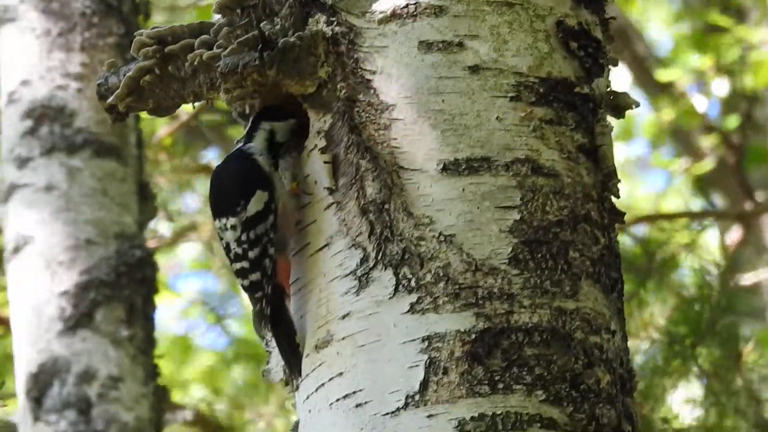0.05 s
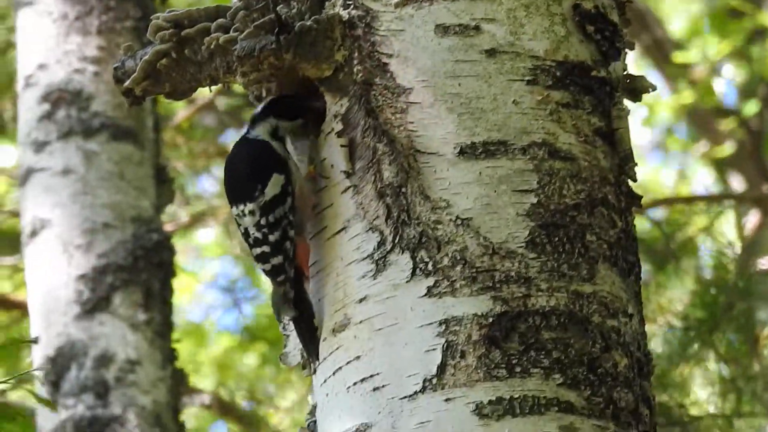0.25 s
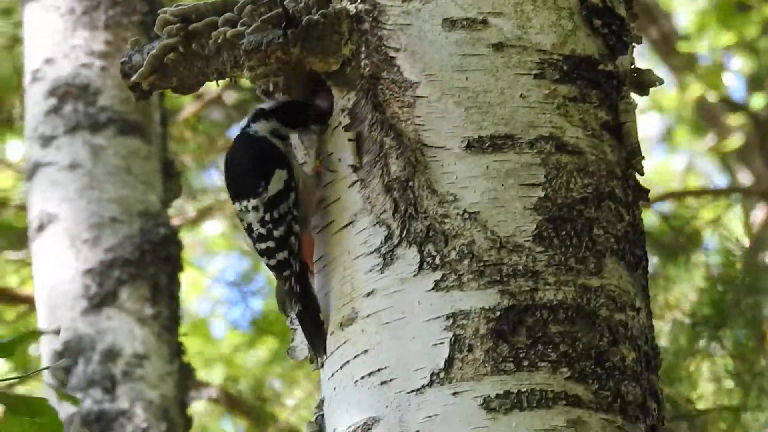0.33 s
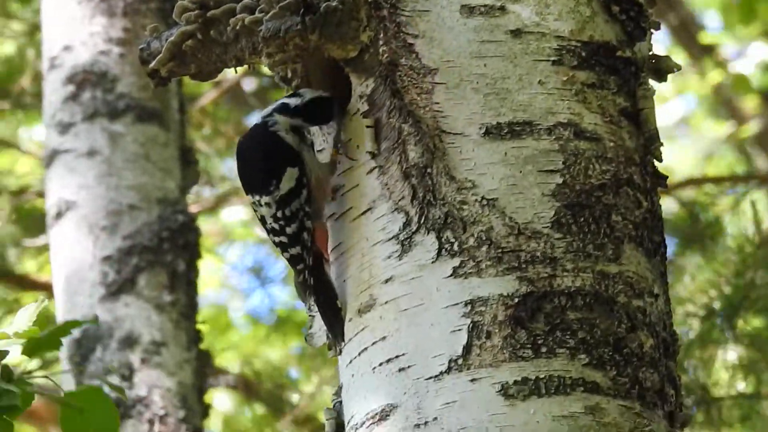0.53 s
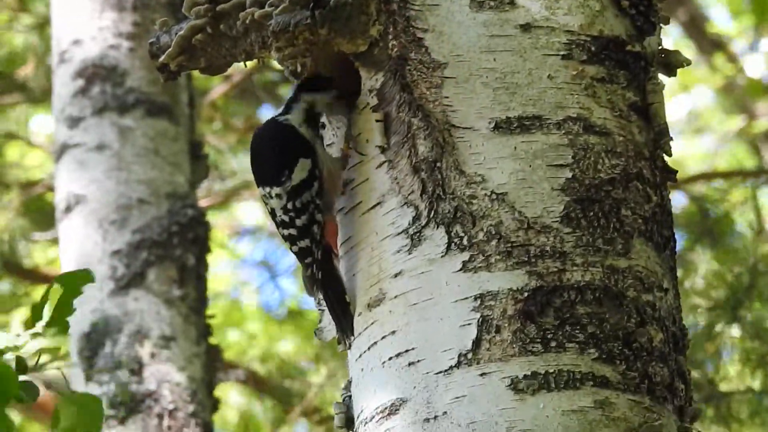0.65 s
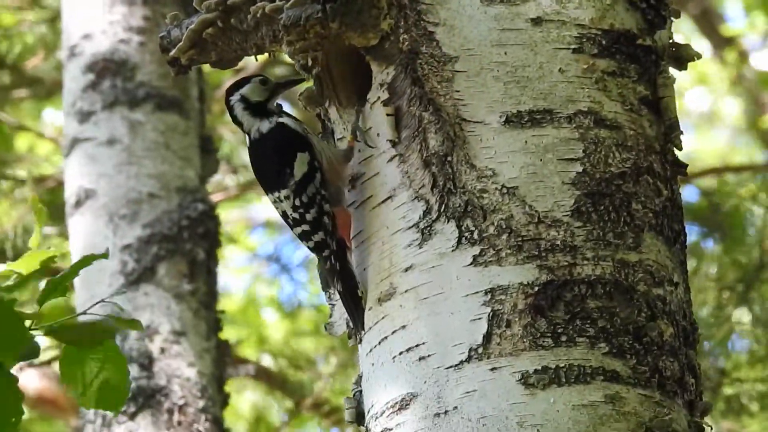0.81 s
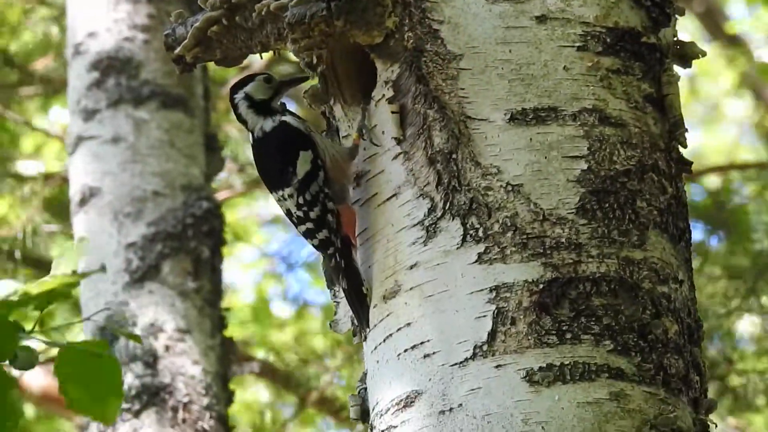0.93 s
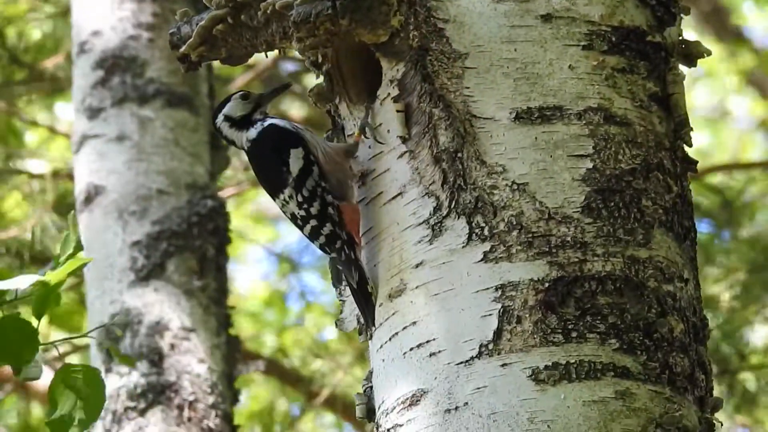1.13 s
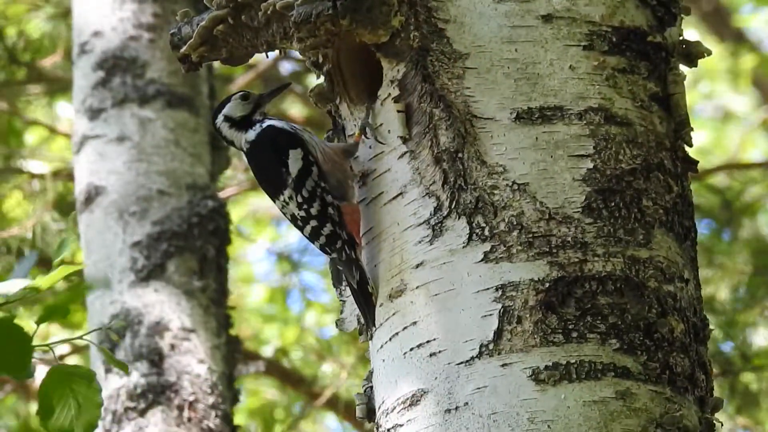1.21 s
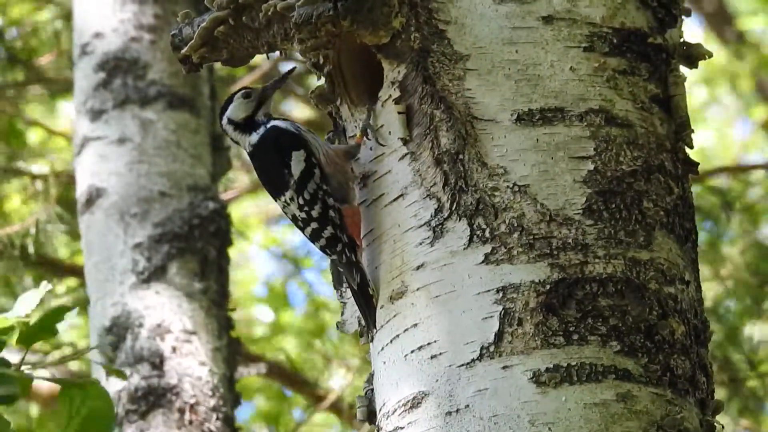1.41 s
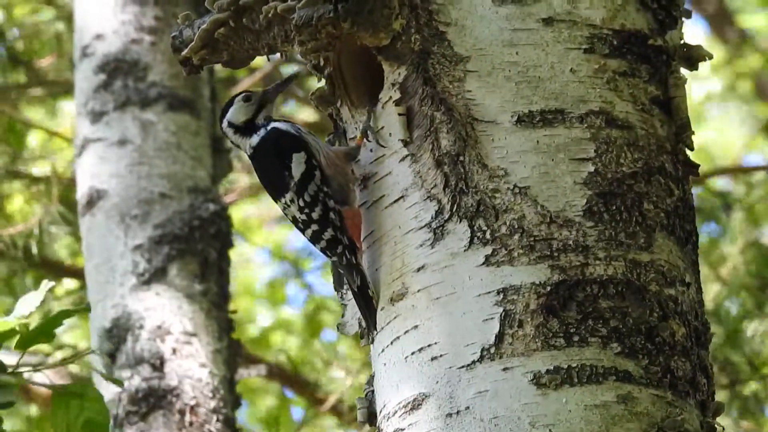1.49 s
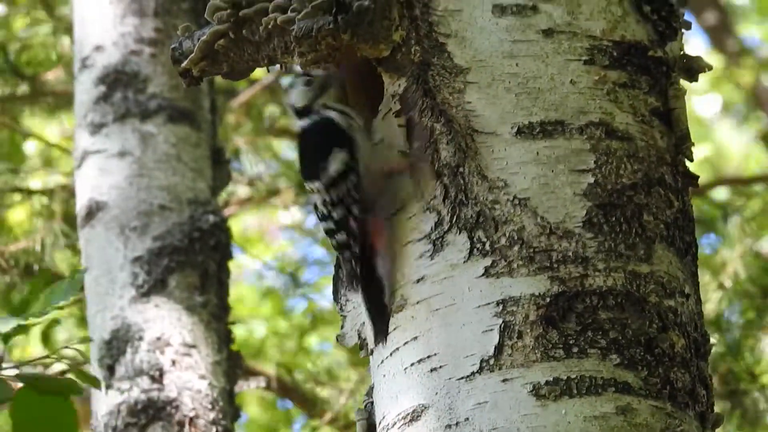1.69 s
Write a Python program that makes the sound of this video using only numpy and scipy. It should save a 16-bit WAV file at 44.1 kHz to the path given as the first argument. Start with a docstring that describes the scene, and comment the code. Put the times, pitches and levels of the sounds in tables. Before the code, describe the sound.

A woodpecker gives short squeaky calls, one far louder, while a songbird whistles in the forest

```python
"""A woodpecker at its nest hole gives seven squeaky calls, one much louder than the rest.
Each is a stack of harmonics: a held lead-in jumps to a crest, then falls away.
A songbird whistles rising, then falling slurs, and ends on faint low notes; bark is scratched twice.
Both birds are scattered by the forest, and the woodpecker also has one late echo.
Shaped noise makes a far rumble with a low drone, and a high haze of distant birds and leaves."""
import sys
import numpy as np
from scipy import signal
from scipy.fft import rfft, irfft, next_fast_len
from scipy.io import wavfile
from scipy.ndimage import uniform_filter1d, map_coordinates

SR = 44100
rng = np.random.default_rng(int(sys.argv[2]) if len(sys.argv) > 2 else 0)


def put_to_file(sound):
    """Save the sound as 16-bit audio at rate SR, in the file named by the first command-line argument."""
    columns = np.atleast_2d(sound).T  # one column per channel
    safe = np.clip(columns, -1, 1)
    whole_steps = np.round(safe * 32767)
    wavfile.write(sys.argv[1], SR, whole_steps.astype(np.int16))


N = 77175  # samples, 1.75 s


def amp(db):
    """Turn decibels into a plain multiplier."""
    return 10 ** (np.asarray(db) / 20)


def unit(x):
    """Scale a sound to an average strength (rms) of 1."""
    return x / np.sqrt(np.mean(x ** 2) + 1e-20)


def along(points, hz):
    """Read a curve of (pitch_hz, value) points, joined on a logarithmic pitch axis."""
    point_hz, value = np.transpose(points)
    return np.interp(np.log(hz + 1), np.log(point_hz + 1), value)


def clock():
    """Time in seconds at every sample."""
    return np.arange(N) / SR


def wobble(rate):
    """A smooth random curve around zero, with rate random knots a second."""
    knots = rng.standard_normal(int(N * rate / SR) + 4)
    return map_coordinates(knots, [clock() * rate])


def filtered(x, response):
    """Change the strength and timing of each frequency in x by a response curve."""
    size = next_fast_len(N + SR // 2)
    hz = np.fft.rfftfreq(size, 1 / SR)
    return irfft(rfft(x, size) * response(hz), size)[..., :N]


# How alike left and right noise are, by pitch; columns: pitch_hz, likeness (1 = identical)
NOISE_LIKENESS = [(40, 0.71), (150, 0.94), (600, 0.97), (1500, 0.88), (3000, 0.95), (5000, 0.43),
                  (12000, 0.15)]


def rush(gain):
    """Coloured stereo noise of rms 1: its ears share most up to 3 kHz and less in the high treble."""
    def mid_side_gain(hz):
        turn = np.arccos(np.clip(along(NOISE_LIKENESS, hz), -1, 1)) / 2
        return gain(hz) * np.array([np.cos(turn), np.sin(turn)])

    mid, side = filtered(rng.standard_normal((2, N)), mid_side_gain)
    return unit(np.array([mid + side, mid - side]))


def patchy(x, depth_db):
    """Slow random swells, different from band to band."""
    bands = signal.stft(x, nperseg=1024)[2]
    field = rng.standard_normal(bands.shape[1:])
    field = uniform_filter1d(field, size=4, axis=0)  # blend neighbouring pitches
    field = uniform_filter1d(field, size=8, axis=1)  # blend neighbouring moments
    swelling = bands * amp(depth_db * unit(field))
    return unit(signal.istft(swelling, nperseg=1024)[1][:, :N])


# Colour of the far rumble; columns: pitch_hz, relative level_db
RUMBLE_COLOUR = [(15, -49), (25, -19), (59, -7), (134, -8.5), (193, 1), (272, -6), (362, -3.5), (643, -4),
                 (778, -8), (1460, -10), (1700, -14.5), (1870, -10.5), (2140, -13), (2400, -10.5),
                 (3120, -16), (5280, -120)]
RUMBLE_DB, RUMBLE_SWELL_DB = -44.5, 1.5
# Colour of the distant birds and leaves; columns: pitch_hz, relative level_db
HAZE_COLOUR = [(1500, -37.5), (2300, -9.5), (3100, -0.5), (3900, -0.5), (5000, 5), (6000, 1.5),
               (7200, -7.5), (8500, -21), (11000, -26), (15500, -36)]
HAZE_DB = -40
DRONE_HZ, DRONE_HALF_WIDTH_HZ, DRONE_DB = 191, 14, -66


def background():
    """Far rumble, a low drone of narrow noise, and a high haze of distant birds and leaves."""
    rumble = rush(lambda hz: amp(along(RUMBLE_COLOUR, hz)))
    rumble = amp(RUMBLE_DB) * patchy(rumble, RUMBLE_SWELL_DB)
    drone = rush(lambda hz: 1 / (1 + ((hz - DRONE_HZ) / DRONE_HALF_WIDTH_HZ) ** 2))
    drone = amp(DRONE_DB) * drone
    haze = rush(lambda hz: amp(along(HAZE_COLOUR, hz)))
    haze = amp(HAZE_DB + 0.3 * wobble(7.3)) * haze
    return rumble + drone + haze


# How long the forest tail rings; columns: pitch_hz, time_s to fade by 60 dB
FOREST_FADE = [(1500, 1), (4500, 0.61), (7000, 0.39), (9000, 0.23), (14000, 0.081)]
# Colour of the forest's answer; columns: pitch_hz, gain_db
FOREST_COLOUR = [(1500, 6), (4500, 4), (6900, 8), (8200, 7.5), (14000, -13)]
FOREST_LIKENESS = 0.57  # left-right likeness, 1 = identical
NEAR_DB, NEAR_FADE_S = -4, 0.089  # near scatter: level, time to fade by 60 dB


def forest(x):
    """Quick scatter from near trunks and a longer tail from the wood, both made of fading noise."""
    _, t, bands = signal.stft(rng.standard_normal((2, SR)), SR, nperseg=256)
    hz = np.arange(129) * SR / 256
    fading = bands * amp(-60 * t / along(FOREST_FADE, hz)[:, None])
    tail = signal.istft(fading, SR, nperseg=256)[1][:, :SR]
    near = rng.standard_normal((2, SR)) * amp(-60 * np.arange(SR) / SR / NEAR_FADE_S)
    scatter = (1.005 * unit(tail) + amp(NEAR_DB) * unit(near)) / np.sqrt(SR)
    turn = np.arccos(np.clip(FOREST_LIKENESS, -1, 1)) / 2
    mid, side = scatter * [[np.cos(turn)], [np.sin(turn)]]
    answer = np.array([mid + side, mid - side])
    wet = signal.fftconvolve(x[None], answer, axes=1)[:, :N]
    return filtered(wet, lambda hz: amp(along(FOREST_COLOUR, hz)))


def placed(x, direction, forest_db):
    """A source heard from one side by level and arrival time, with the forest's answer added."""
    pan_db, lead_ms = direction
    half = np.array([[.5], [-.5]])  # share the difference between left and right
    lead_s = lead_ms / 1000
    direct = filtered(x, lambda hz: amp(half * pan_db) * np.exp(2j * np.pi * hz * half * lead_s))
    return direct + amp(forest_db) * forest(x)


# The woodpecker's calls, one a row; columns:
# crest_s, lead_in_s, rise_s, fall_s (times), start_hz, lead_in_hz, crest_hz (pitches),
# start_db, lead_in_db, crest_db (levels), throat_hz (resonance), second_harmonic_db,
# upper_harmonics_db (extra on the fifth and up), rasp (0 to 1), forest_db (forest's answer)
CALLS = [ (0.017, 0.0075, .010, .026, 1308, 1350, 1430, -65, -46, -41, 5600, 11.5, 2, 0.38, -7.5),
         (0.249, .056, 0.034, 0.023, 1440, 1336, 1676, -48.5, -36, -30, 6030, 5.5, 3, 0, -10.5),
         (.478, .056, .010, .039, 1340, 1571, 1924, -37.5, -15, -18, 5230, -1.5, -7.5, 0.07, -16),
         (.735, .060, 0.019, 0.019, 1540, 1463, 1706, -41, -34, -30.5, 6030, 6, 1.5, 0.81, -6.5),
         (1.029, .012, .038, 0.026, 1411, 1479, 1850, -64, -39.5, -31, 6290, 5, -1, 0.31, -6.5),
         (1.301, .040, .020, .020, 1400, 1349, 1504, -55, -36.5, -36, 5900, 9.5, -0.5, 0.75, -8),
         (1.571, .045, 0.0096, 0.012, 1462, 1327, 1513, -54, -42, -34, 5800, 10.5, -3, 0.51, -10.5)]
# Balance of the voice, from the fundamental up; column: relative level_db
HARMONIC_LEVELS = [-11.5, -9, 0.5, -0.5, -8.5, -10, -10.5]
# Colour the beak gives the voice; columns: pitch_hz, gain_db
BEAK_COLOUR = [(1400, -15), (1900, 2), (3000, 3.5), (7000, 0.5), (8200, -1), (9600, 5), (11000, -14),
               (12500, -7), (14500, -21)]
# Colour of the rasp in the throat; columns: pitch_hz, relative level_db
RASP_COLOUR = [(2000, -35), (3200, 6), (4000, -1), (5800, 10.5), (7500, -1.5), (9500, -15.5), (12000, -6.5),
               (15000, -34)]
# The woodpecker's direction; columns: left_over_right_db, left_lead_ms
WOODPECKER_SIDE = (0.2, 0.0097)
RASP_DB = -42  # at full rasp
THROAT_DB, THROAT_HALF_WIDTH_HZ = 11, 895
END_HZ, FALL_POWER, FALL_RATE = 1180, 3.6, 2.9  # pitch the fall heads for, its lateness and speed
FADE_DB, SECOND_GROWS_DB = 10.5, 9.5  # over the fall: level lost, gain of the second harmonic
JITTER, RASP_JITTER, SHIMMER_DB = .003, .05, .8  # pitch shake (fraction), added by rasp; level shake
ECHO_S, ECHO_DB = 0.069, -26


def woodpecker():
    """Harmonics through a throat resonance: swelling, often raspy lead-in, jump, late-bending fall."""
    t, out = clock(), np.zeros((2, N))
    k = np.arange(1, len(HARMONIC_LEVELS) + 1)[:, None]  # harmonic number
    harmonic_db = np.array(HARMONIC_LEVELS)[:, None]
    hiss = filtered(rng.standard_normal(N), lambda hz: amp(along(RASP_COLOUR, hz)))
    hiss = amp(RASP_DB) * unit(hiss)
    for (crest_s, lead_s, rise_s, fall_s, start_hz, lead_hz, crest_hz, start_db, lead_db, crest_db,
         throat_hz, second_db, upper_db, rasp, forest_db) in CALLS:
        # progress of each stage, from 0 towards 1
        jump_s = crest_s - rise_s
        held = np.clip((t - jump_s + lead_s) / lead_s, 0, 1)
        risen = np.sin(np.pi / 2 * np.clip((t - jump_s) / rise_s, 0, 1)) ** 2
        fallen = 1 - np.exp(-FALL_RATE * np.clip((t - crest_s) / fall_s, 0, 2) ** FALL_POWER)

        pitch = lead_hz + (start_hz - lead_hz) * (1 - held) ** 2.78
        pitch += (crest_hz - lead_hz) * risen - (crest_hz - END_HZ) * fallen
        pitch *= 1 + JITTER * wobble(500) + RASP_JITTER * rasp * (1 - risen) * wobble(650)
        level_db = start_db + (lead_db - start_db) * held + (crest_db - lead_db) * risen
        level_db += SHIMMER_DB * wobble(300) - FADE_DB * fallen

        begin_s, end_s = jump_s - lead_s, crest_s + fall_s
        gate = np.interp(t, [begin_s - .004, begin_s, end_s, end_s + .005], [0, 1, 1, 0])
        on = gate > 0
        hz = k * pitch[on]
        throat_db = THROAT_DB / (1 + ((hz - throat_hz) / THROAT_HALF_WIDTH_HZ) ** 4)
        second = (k == 2) * (second_db + SECOND_GROWS_DB * fallen[on])
        source_db = harmonic_db + upper_db * (k > 4) + second
        gains = amp(source_db + throat_db + along(BEAK_COLOUR, hz))
        tones = gains * np.sin(2 * np.pi * np.cumsum(hz, axis=1) / SR)
        voice = np.zeros(N)
        # dividing by the total strength leaves the loudness to level_db
        voice[on] = np.sqrt(2) * tones.sum(0) / np.linalg.norm(gains, axis=0)
        breath = hiss * rasp * (.5 + .5 * held) * (1 - fallen)
        voice = gate * (voice * amp(level_db) + breath)
        echo = amp(ECHO_DB) * np.interp(t - ECHO_S, t, voice, left=0)
        out += placed(voice, WOODPECKER_SIDE, forest_db) + echo
    return out


def whistles(shape, notes, waver=0.0033, flutter_db=1):
    """Repeat one note shape as a pure tone, with slight random shakes of pitch and level."""
    t, out = clock(), np.zeros(N)
    when, hz, db = np.transpose(shape)
    for crest_s, note_db in notes:
        pitch = uniform_filter1d(np.interp(t - crest_s, when, hz), size=150)  # round the corners
        pitch = pitch * (1 + waver * wobble(400))
        shape_db = np.interp(t - crest_s, when, db, left=-120, right=-120)
        level = amp(note_db + shape_db + flutter_db * wobble(200))
        out += np.sqrt(2) * level * np.sin(2 * np.pi * np.cumsum(pitch) / SR)
    return out


# Songbird note shapes; columns: time_s from the crest, pitch_hz, relative level_db
UPSLUR_SHAPE = [(-.072, 3650, -25), (-.064, 3780, -5), (-.045, 3960, -8), (-.025, 4020, -8),
                (-.012, 4250, -7), (-.007, 4600, -1), (-.002, 5850, 1), (.001, 6200, 0), (.005, 5700, -4),
                (.009, 4800, -25)]
FLICK_SHAPE = [(-.005, 6200, -31), (-.001, 5600, 9.5), (.003, 5000, -0.5), (.008, 4500, -16)]
SOFT_SLUR_SHAPE = [(-.014, 3900, -12), (-.004, 4480, 0), (.008, 4380, -1), (.026, 3750, 0),
                   (.043, 3150, -2), (.05, 2600, -1), (.055, 2450, -18)]
DOWNSLUR_SHAPE = [(-.024, 3100, -26), (-.014, 3900, -17), (-.008, 4720, -6), (0, 5040, -3), (.008, 4830, 0),
                  (.016, 4450, -1), (.022, 4150, -14), (.036, 3600, -12), (.05, 3130, -15),
                  (.058, 2900, -32)]
LOW_NOTE_SHAPE = [(-.03, 2750, -14), (-.022, 2860, -2), (-.008, 3040, 0), (.003, 3110, 0),
                  (.016, 3050, -12)]
# When each shape is sung; columns: crest_s, level_db
UPSLUR_TIMES = [(.061, -32.5), (.201, -34), (.347, -33.5)]
FLICK_TIMES = [(0.569, -37), (0.879, -41.5), (1.203, -41.5)]
SOFT_SLUR_TIMES = [(.603, -37)]
DOWNSLUR_TIMES = [(.758, -25.5), (0.909, -26), (1.071, -26), (1.236, -26)]
LOW_NOTE_TIMES = [(1.385, -45.5), (1.461, -45), (1.542, -42), (1.620, -42.5), (1.698, -42.5)]
# The songbird's direction; columns: left_over_right_db, left_lead_ms
SONGBIRD_SIDE = (-0.5, -0.016)
SONG_FOREST_DB, LOW_FOREST_DB = -9, -9


def songbird():
    """Gliding pure tones slightly to the right, then fainter low notes a little further right."""
    song = whistles(UPSLUR_SHAPE, UPSLUR_TIMES)
    song += whistles(SOFT_SLUR_SHAPE, SOFT_SLUR_TIMES)
    song += whistles(DOWNSLUR_SHAPE, DOWNSLUR_TIMES)
    song += whistles(FLICK_SHAPE, FLICK_TIMES)
    low = whistles(LOW_NOTE_SHAPE, LOW_NOTE_TIMES)
    return placed(song, SONGBIRD_SIDE, SONG_FOREST_DB) + placed(low, (-2, 0), LOW_FOREST_DB)


# Scratches on the bark; columns: peak_s, level_db
SCRATCH_TIMES = [(0.833, -44), (0.874, -41.5)]
# Colour of scraped bark; columns: pitch_hz, relative level_db
BARK_COLOUR = [(500, -21), (2100, 13), (3500, -7), (6500, -7), (9000, -21), (15000, -35)]
SCRATCH_S = 0.0042  # from the peak to about a third of its height


def scratches():
    """Short dry scrapes on the bark: coloured noise in brief rounded bursts."""
    level = np.zeros(N)
    for peak_s, level_db in SCRATCH_TIMES:
        level += amp(level_db) * np.exp(-((clock() - peak_s) / SCRATCH_S) ** 2)
    return level * rush(lambda hz: amp(along(BARK_COLOUR, hz)))


# Tone difference between the ears; columns: pitch_hz, left_over_right_db
LEFT_TILT = [(3000, -4.5), (5800, -2.5), (7500, 7), (10000, 0.5), (14000, 1)]


def scene():
    """Birds and scratches, with a left-right tone difference, over the background."""
    near = woodpecker() + songbird() + scratches()
    half = np.array([[.5], [-.5]])
    return filtered(near, lambda hz: amp(half * along(LEFT_TILT, hz))) + background()


LOW_CUT_HZ, TOP_HZ = 39, 15700


def record(dry):
    """Weaken the deepest bass and keep nothing from the top limit up."""
    def response(hz):
        bass_cut = hz ** 2 / np.sqrt(hz ** 4 + LOW_CUT_HZ ** 4)
        return (hz < TOP_HZ) * bass_cut

    return filtered(dry, response)


dry = scene()
out = record(dry)
put_to_file(out)
```